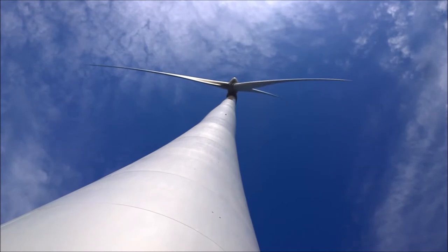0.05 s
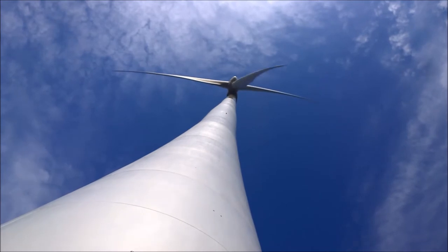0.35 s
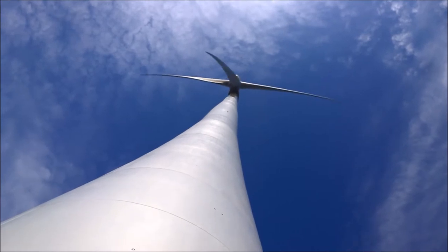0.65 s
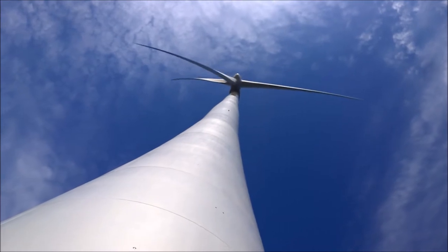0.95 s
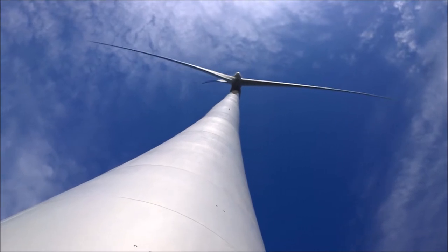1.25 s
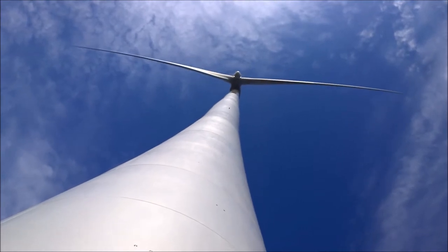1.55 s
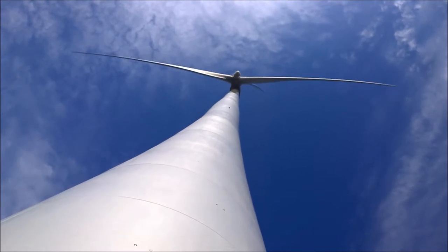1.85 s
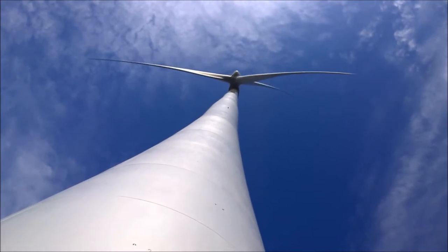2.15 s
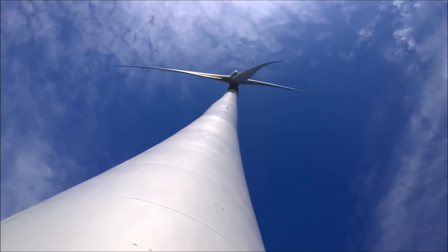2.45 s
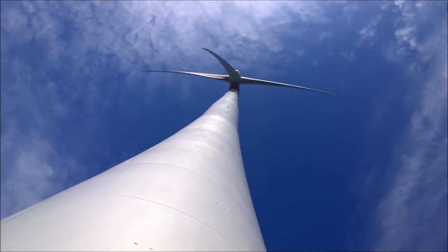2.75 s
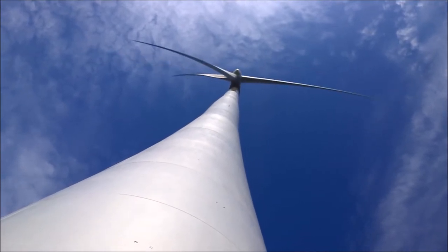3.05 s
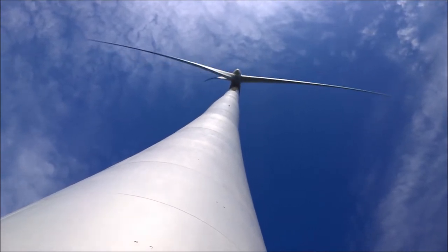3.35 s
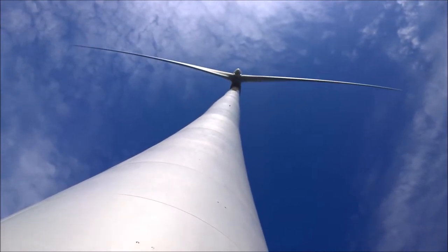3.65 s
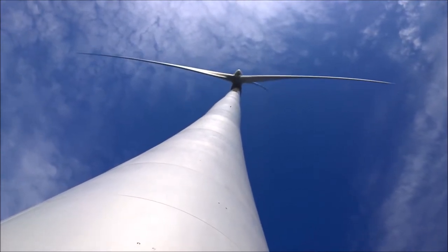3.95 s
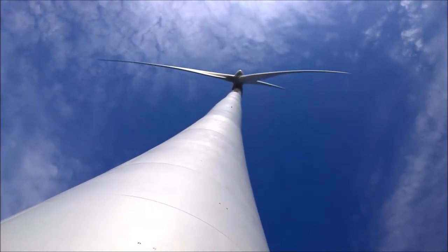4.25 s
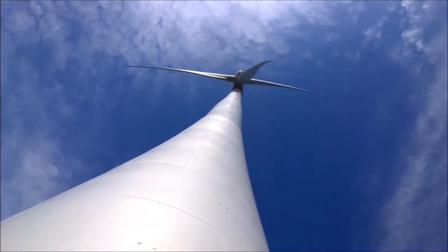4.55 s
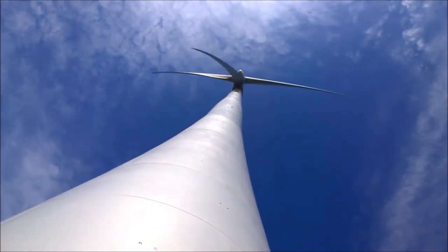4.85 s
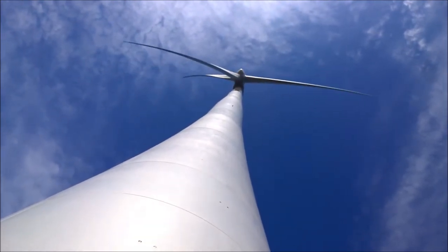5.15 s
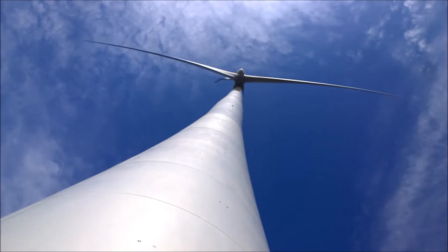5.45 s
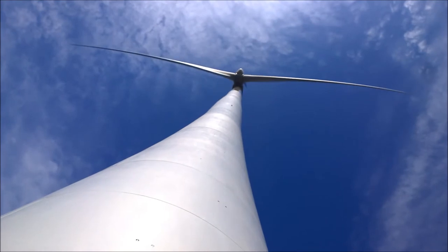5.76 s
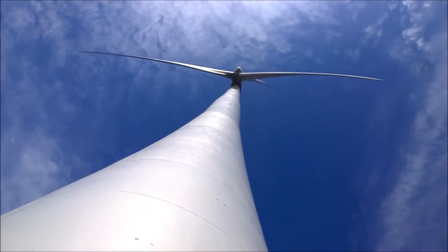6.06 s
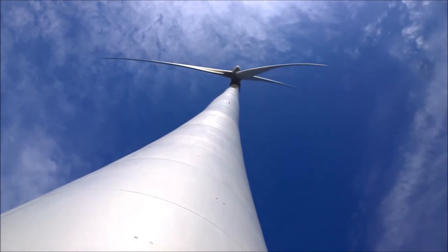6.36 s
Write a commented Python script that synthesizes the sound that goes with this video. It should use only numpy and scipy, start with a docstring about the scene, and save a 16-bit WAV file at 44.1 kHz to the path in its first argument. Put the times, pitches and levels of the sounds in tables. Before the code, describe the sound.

Gusty wind rumbles on the microphone, then eases, over a humming wind turbine whose blades swish about every two seconds.

```python
"""Gusty wind rumbles and thumps on the left and right microphones, hard at first, then easing off.
Under it a wind turbine hums: its gearbox sounds through the steel tower, and the tower rings along.
Far above, a blade swishes down through the air about every two seconds.
Behind it all lies the steady roar of the machine and the open field."""
import sys
import numpy as np
from scipy import signal
from scipy.fft import rfft, irfft, next_fast_len
from scipy.io import wavfile
from scipy.ndimage import uniform_filter1d

SR = 44100
rng = np.random.default_rng(int(sys.argv[2]) if len(sys.argv) > 2 else 0)


def to_wav(s):
    """Save 16-bit WAV."""
    ch = np.atleast_2d(s).T  # columns
    pcm = np.round(np.clip(ch, -1, 1) * 32767)  # PCM
    wavfile.write(sys.argv[1], SR, pcm.astype(np.int16))


N = 291501
TIME = np.arange(N) / SR
FRAME, HOP = 2048, 256  # noise is shaped in short, overlapping frames
FRAME_TIME = np.arange(-(-N // HOP) + 1) * HOP / SR
BIN_HZ = np.fft.rfftfreq(FRAME, 1 / SR)[:, None]


# Two long gusts, then a lull: time_s, left_db, right_db
WIND_FORCE = [(0, -30, -35.5), (.22, -25, -43.5), (.6, -28, -32), (.95, -21.5, -33), (1.35, -27.5, -30),
              (1.85, -27.5, -32), (2.15, -33.5, -33.5), (2.55, -34, -37), (2.92, -43, -32.5),
              (3.15, -32.5, -27), (3.55, -32, -30), (3.95, -40, -40.5), (4.8, -44, -45.5),
              (5.3, -49.5, -50.5), (5.75, -43.5, -42.5), (6.6, -46.5, -43)]
# Tone of the rumble in a moderate wind: pitch_hz, relative_db
RUMBLE_TONE = [(5, -41.5), (12, -29.5), (20, -16), (32, -15.5), (50, -16.5), (70, -23.5), (100, -30.5),
               (150, -35), (220, -53), (400, -62), (1000, -80), (4000, -130)]

def wind_rumble(moderate_db=-32, db_per_octave=45, steadiness=0.5):
    """Air churns on each microphone separately; stronger wind reaches higher in pitch."""
    force_db = np.array([curve(WIND_FORCE, FRAME_TIME, side) for side in (1, 2)])[:, None]
    reach = 2 ** ((force_db - moderate_db) / db_per_octave)
    churn = white_noise() * gain(tone_db(RUMBLE_TONE, BIN_HZ / reach))
    # partly even out chance swells, so the loudness follows the wind
    power = uniform_filter1d((abs(churn) ** 2).sum(1, keepdims=True), size=36, axis=2)
    evening_out = (power / power.mean()) ** (-steadiness / 2)
    return to_sound(churn * gain(force_db) * evening_out)


# Small swirls of air: peak_s, half_length_s, level_db, pitch_factor, side (0 left, 1 right)
EDDY_HITS = [(0.142, 0.027, -26.5, 0.67, 0), (0.349, 0.017, -32, 0.76, 0), (0.845, 0.009, -36, 1.47, 0),
             (0.904, 0.023, -26.5, 0.8, 0), (1.039, 0.054, -28, 1.04, 0), (1.162, 0.018, -25.5, 0.65, 0),
             (1.366, 0.0049, -16.5, 0.84, 0), (1.403, 0.02, -31, 1.32, 0), (1.864, 0.03, -32.5, 0.9, 0),
             (1.922, 0.0055, -13, 0.47, 0), (3.238, 0.013, -27.5, 0.68, 1), (3.572, 0.044, -24.5, .42, 0),
             (4.134, 0.015, -24, .35, 1), (4.395, 0.066, -28.5, 0.2, 0), (4.887, 0.026, -36, 0.37, 1),
             (5.628, 0.03, -29, 0.28, 0), (5.84, 0.045, -35, 0.27, 1), (6.08, 0.028, -33, 0.32, 0),
             (6.154, 0.021, -27.5, 0.31, 1), (6.528, 0.032, -41, 0.32, 0)]
# Tone of one swirl: pitch_hz, relative_db
EDDY_TONE = [(20, -36.5), (70, -16.5), (140, -18), (200, -22.5), (300, -34.5), (450, -43.5), (800, -62.5),
             (3000, -120)]

def eddy_thumps():
    """Each swirl strikes one microphone with a short, dull thump."""
    out, hz = np.zeros((2, N)), np.fft.rfftfreq(SR, 1 / SR)
    for peak_s, half_length_s, level_db, pitch_factor, side in EDDY_HITS:
        tone = gain(level_db + tone_db(EDDY_TONE, hz / pitch_factor))
        air = irfft(rfft(rng.standard_normal(SR)) * tone) * np.sqrt(SR / 2)
        out[int(side > .5)] += np.resize(air, N) * bell(TIME, peak_s, half_length_s)
    return out


# The gears speed up slightly as they quieten: time_s, pitch_hz, low_hum_db, high_hum_db
GEAR_RUN = [(0, 103, -37, -50), (.5, 103, -45.5, -50), (.9, 102.7, -40, -47.5), (1.85, 103.9, -40, -45),
            (2.5, 104.2, -44, -53.5), (2.8, 104, -40, -57), (3, 104.4, -51.5, -55),
            (3.22, 104.4, -34, -58.5), (3.5, 104.5, -53.5, -57.5), (4.4, 106, -49, -55),
            (5.3, 106.3, -52, -58.5), (6.6, 107.3, -46.5, -56)]

def gear_hum(pitch_ratio, level_column, flutter_share, flutter_hz):
    """Gear teeth meet and hum; part of the tone flutters under the uneven load."""
    swing = np.sqrt(1 - flutter_share ** 2) + flutter_share * flutter(flutter_hz)
    tone = np.exp(2j * np.pi * pitch_ratio * np.cumsum(curve(GEAR_RUN, TIME)) / SR)
    return np.sqrt(2) * gain(curve(GEAR_RUN, TIME, level_column)) * (swing * tone).real


# Notes of the tower and the housing on top: pitch_hz, width_hz, level_db
TOWER_NOTES = [(36, 8.2, -55), (155.6, 21, -59), (206.1, 12, -58.5), (437, 23, -68), (545.6, 27, -69.5),
               (747.5, 49, -71.5), (949, 77, -70)]

def tower_ring():
    """The steel shell rings, shaken by the machinery."""
    return np.sqrt(2) * sum(gain(db) * (flutter(width_hz) * np.exp(2j * np.pi * hz * TIME)).real
                            for hz, width_hz, db in TOWER_NOTES)


# One row for each passing blade: swish_db, whoosh_db, tip_hiss_db
BLADE_PASSES = [(-61.5, -76, -83), (-61, -74.5, -83), (-59, -71.5, -79.5), (-56.5, -71.5, -79)]

def blade_passes(column, lead_s, attack_s, hold_s, release_s, sag_db_per_s):
    """Loudness of one blade sound: each pass swells, sags as the blade moves on, and fades."""
    first_pass_s, period_s = -0.021, 2
    power = 0
    for count, levels_db in enumerate(BLADE_PASSES):
        age_s = FRAME_TIME - (first_pass_s + count * period_s - lead_s)
        swell = np.clip(np.minimum(age_s / attack_s, 1 - (age_s - attack_s - hold_s) / release_s), 0, 1)
        sag_db = sag_db_per_s * np.maximum(age_s - attack_s, 0)
        power += (swell * gain(levels_db[column] - sag_db)) ** 2
    return np.sqrt(power)


# Short rushes where a blade meets a gust: peak_s, half_length_s, whoosh_db, swish_db, tip_hiss_db
GUST_RUSHES = [(0.223, 0.1, -72, -65, -85), (1.113, 0.044, -70.5, -64.5, -85.5),
               (1.708, 0.072, -75.5, -58, -91), (1.984, 0.13, -73.5, -60, -89),
               (3.203, 0.24, -77.5, -61, -86), (3.69, 0.11, -70.5, -60, -86), (4, 0.068, -72, -65, -81),
               (4.444, .05, -73, -53.5, -78), (4.576, 0.043, -65.5, -76, -84), (4.79, 0.077, -68, -80, -86),
               (5.097, 0.039, -66.5, -60, -82), (6.107, .12, -96, -54.5, -93),
               (6.457, .07, -72, -71, -81.5)]
# Tones of the low swish, the higher whoosh and the hiss of the tips: pitch_hz, relative_db
SWISH_TONE = [(60, -38.5), (200, -20.5), (420, -27.5), (700, -25), (950, -30), (1250, -36.5), (1500, -50.5),
              (2500, -55.5), (8000, -96)]
WHOOSH_TONE = [(600, -47), (1200, -25.5), (1600, -31), (1950, -31.5), (2400, -37), (3000, -47.5),
               (4000, -49), (8000, -82.5)]
TIP_TONE = [(1500, -42), (2800, -30.5), (3600, -33.5), (4800, -31.5), (5400, -40), (7000, -43),
            (10000, -66.5)]

def blade_power(waver_db=0.75):
    """Blades slice the air, making three bands of noise that waver together."""
    waver = gain(waver_db * np.sqrt(2) * np.interp(FRAME_TIME, TIME, flutter(width_hz=13).real))
    swish = blade_passes(0, lead_s=0.62, attack_s=0.55, hold_s=1.9, release_s=0.32, sag_db_per_s=3)
    whoosh = blade_passes(1, lead_s=0.62, attack_s=0.8, hold_s=0.95, release_s=0.29, sag_db_per_s=1.6)
    tips = blade_passes(2, lead_s=0.64, attack_s=1.01, hold_s=0.8, release_s=0.54, sag_db_per_s=3.5)
    whoosh_rush, swish_rush, tip_rush = sum(gain(levels_db)[:, None] * bell(FRAME_TIME, peak_s, half_s)
                                            for peak_s, half_s, *levels_db in GUST_RUSHES)
    swish = spectrum(SWISH_TONE) * np.hypot(swish * waver, swish_rush) * pan(left_db=-3.5)
    whoosh = spectrum(WHOOSH_TONE) * np.hypot(whoosh * waver, whoosh_rush) * pan(left_db=-6)
    tips = spectrum(TIP_TONE) * np.hypot(tips * waver, tip_rush) * pan(left_db=0.3)
    return swish ** 2 + whoosh ** 2 + tips ** 2


# Low whumps from the blades: peak_s, half_length_s, level_db
WHUMP_HITS = [(3.56, 0.037, -44), (3.928, 0.036, -41.5), (4.111, 0.041, -51), (4.44, 0.18, -48),
              (5.733, 0.031, -42), (6.025, 0.064, -49), (6.352, 0.099, -47.5)]
# Tone of one whump: pitch_hz, relative_db
WHUMP_TONE = [(60, -40), (180, -31.5), (270, -27.5), (400, -36.5), (800, -56), (1500, -57.5), (4000, -100)]

def whump_power():
    """A blade cuts rough air with a low whump."""
    swells = sum(gain(db) * bell(FRAME_TIME, peak_s, half_s) for peak_s, half_s, db in WHUMP_HITS)
    return (spectrum(WHUMP_TONE) * swells) ** 2


# Tone of the background roar: pitch_hz, level_db_per_hz
ROAR_TONE = [(10, -87), (40, -69), (90, -71), (130, -77.5), (270, -79), (350, -83.5), (500, -86.5),
             (850, -88.5), (1100, -93.5), (1500, -107), (2400, -110), (3500, -117.5), (6000, -130)]

def roar_power():
    """The machine and the open field roar steadily."""
    return (spectrum(ROAR_TONE) * pan(left_db=-1)) ** 2


# How alike distant sound is on the left and right: pitch_hz, likeness (1 means the same)
STEREO_LIKENESS = [(100, 1), (300, 0.99), (550, 0.87), (900, 0.56), (1500, 0.22), (2700, 0.3), (6000, 0.11)]

def through_air(power, patchy_db=1.67):
    """Distant noise of the given power arrives through churning air, alike on both sides in the bass."""
    left, other = white_noise()
    likeness = np.clip(at_pitch(STEREO_LIKENESS, BIN_HZ), -1, 1)
    right = likeness * left + np.sqrt(1 - likeness ** 2) * other
    # louder and softer patches, 20 pitch steps high and 16 frames long
    patches = rng.standard_normal((len(BIN_HZ), len(FRAME_TIME)))
    patches = uniform_filter1d(uniform_filter1d(patches, 20, axis=0), 16, axis=1)
    return to_sound(np.array([left, right]) * np.sqrt(power) * gain(patchy_db * patches / patches.std()))


def gain(db):
    """Turn decibels into a multiplier."""
    return 10 ** (np.asarray(db) / 20)


def at_pitch(table, hz):
    """Look up a table between its listed pitches."""
    pitches, values = np.transpose(table)
    return np.interp(np.log(hz + 1), np.log(pitches + 1), values)


tone_db = at_pitch  # tone tables hold decibels


def spectrum(table):
    """A tone table as one multiplier for each pitch in a frame."""
    return gain(tone_db(table, BIN_HZ))


def curve(table, time_s, column=1):
    """Look up one column of a table between its listed times."""
    table = np.asarray(table)
    return np.interp(time_s, table[:, 0], table[:, column])


def bell(time_s, peak_s, half_length_s):
    """A smooth rise and fall around a peak."""
    return np.exp(-.5 * ((time_s - peak_s) / half_length_s) ** 2)


def pan(left_db):
    """Make the left side this much louder than the right."""
    return gain([left_db / 2, -left_db / 2])[:, None, None]


def flutter(width_hz):
    """A random wobble of strength 1; more width makes it faster."""
    hz = np.fft.fftfreq(next_fast_len(N), 1 / SR)
    phases = np.exp(2j * np.pi * rng.random(len(hz)))
    wobble = np.fft.ifft(phases / (1 + (hz / width_hz) ** 2) ** 2)[:N]
    return wobble / np.sqrt(np.mean(abs(wobble) ** 2))


def white_noise():
    """Frames of separate left and right noise, 0 dB per Hz."""
    noise = rng.standard_normal((2, N)) * np.sqrt(SR / 2)
    return signal.stft(noise, nperseg=FRAME, noverlap=FRAME - HOP)[2]


def to_sound(frames):
    """Join frames into a sound wave."""
    return signal.istft(frames, nperseg=FRAME, noverlap=FRAME - HOP)[1][:, :N]


def scene():
    """The turbine, with the wind on the microphones over it."""
    low_hum = gear_hum(pitch_ratio=1, level_column=2, flutter_share=0.39, flutter_hz=19)
    high_hum = gear_hum(pitch_ratio=1.988, level_column=3, flutter_share=0.56, flutter_hz=11)
    machinery = low_hum + high_hum + tower_ring()
    distant = through_air(blade_power() + whump_power() + roar_power())
    return wind_rumble() + eddy_thumps() + machinery + distant


# The microphones' own hiss: pitch_hz, level_db_per_hz
HISS_TONE = [(100, -112), (2500, -116), (3800, -121), (5000, -118), (5900, -117), (6800, -122),
             (8500, -126), (15500, -128)]

def record(dry, cutoff_hz=15750):
    """The microphones add a faint hiss, and the highest treble is cut away."""
    noisy = dry + to_sound(white_noise() * spectrum(HISS_TONE))
    treble_cut = signal.firwin(511, cutoff_hz, window=("kaiser", 9), fs=SR)
    return signal.oaconvolve(noisy, treble_cut[None], "same")


dry = scene()
out = record(dry)
to_wav(out)
```